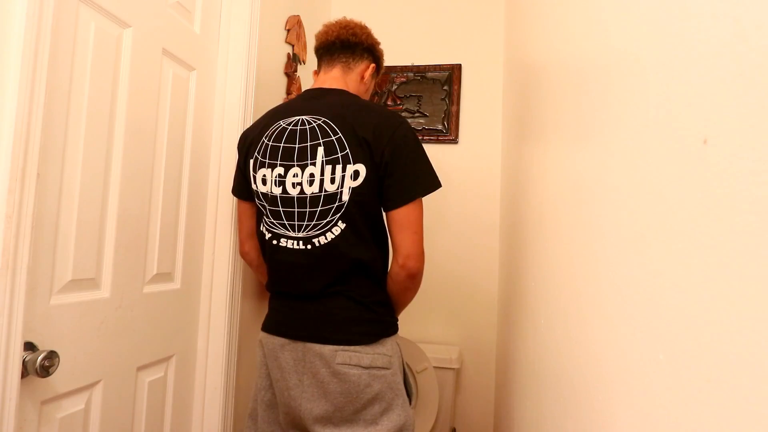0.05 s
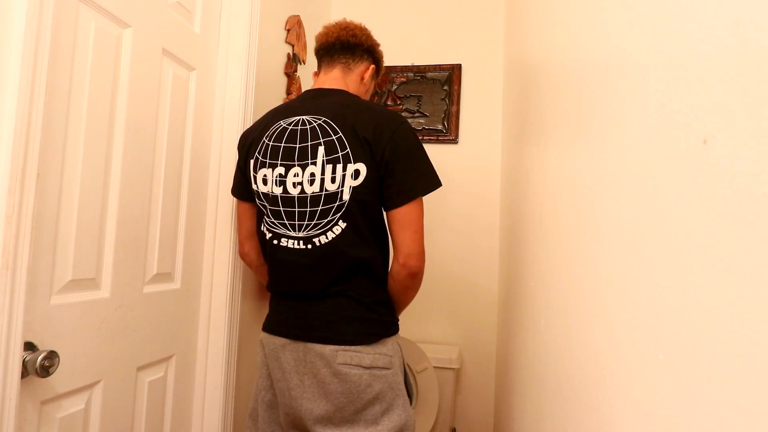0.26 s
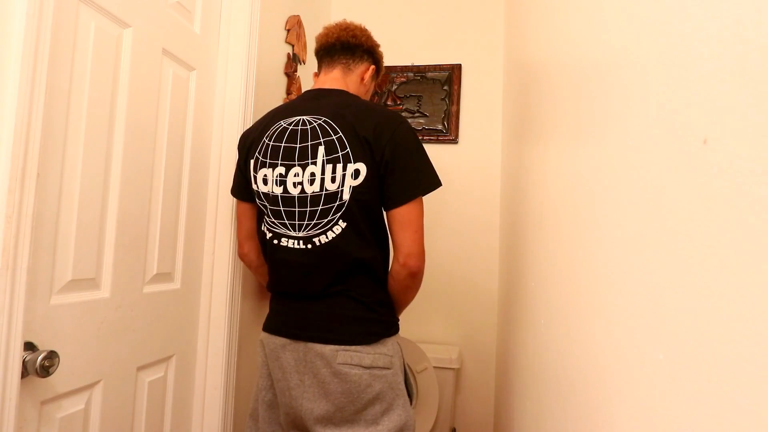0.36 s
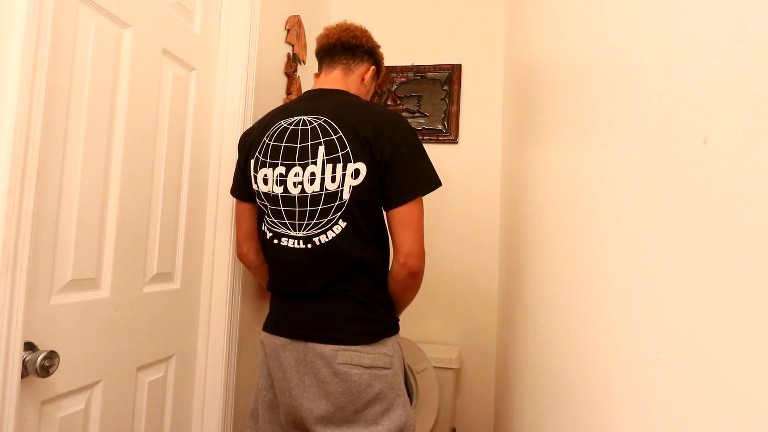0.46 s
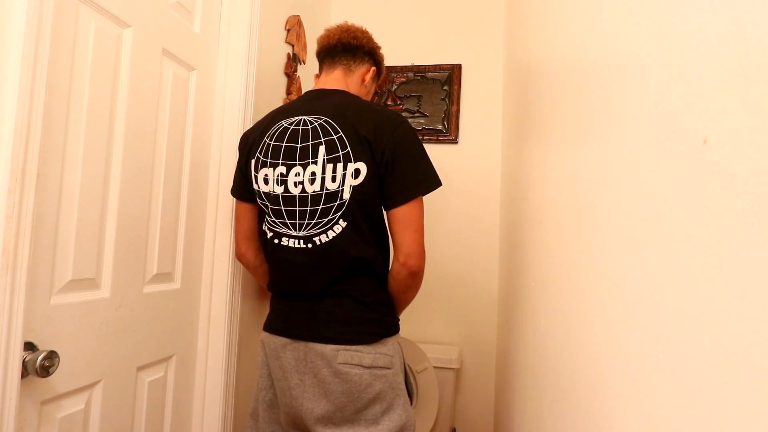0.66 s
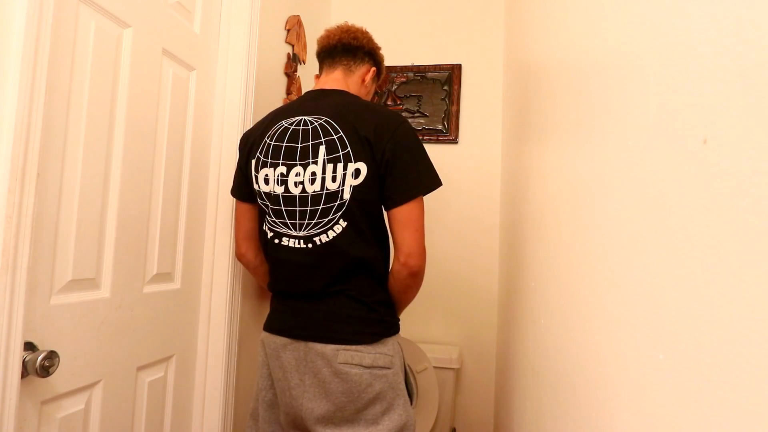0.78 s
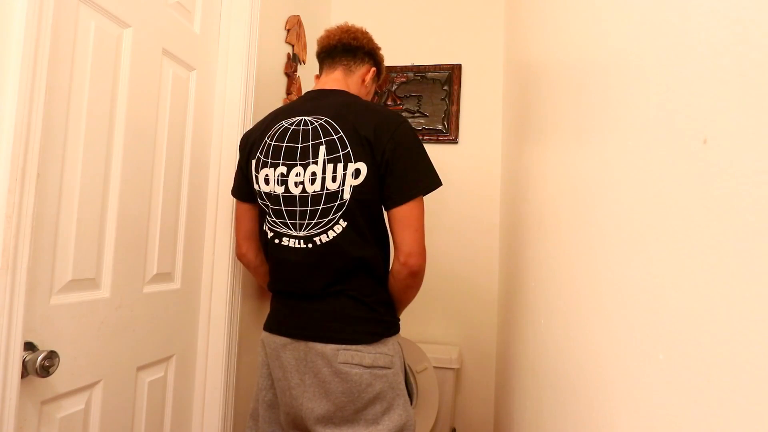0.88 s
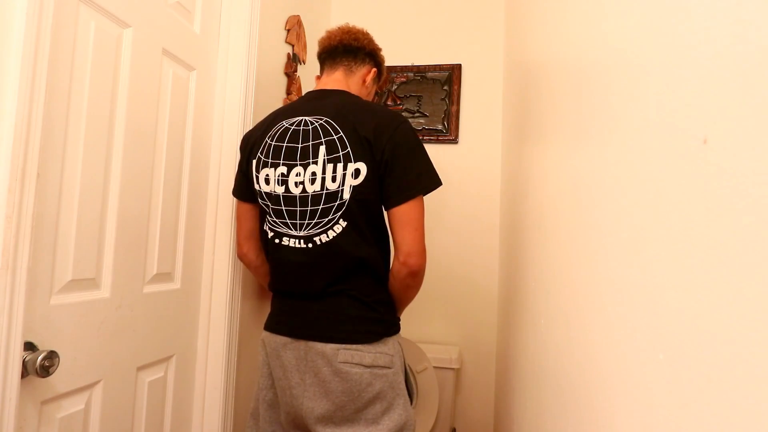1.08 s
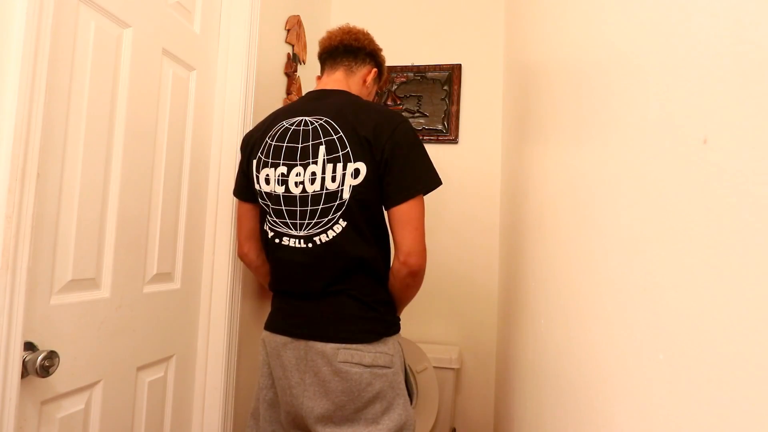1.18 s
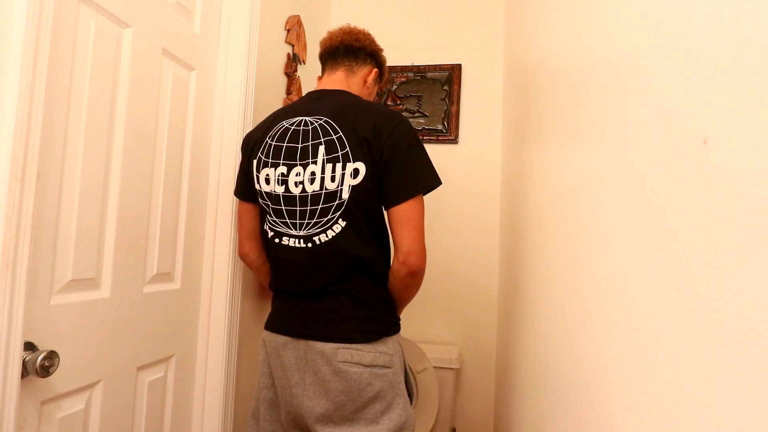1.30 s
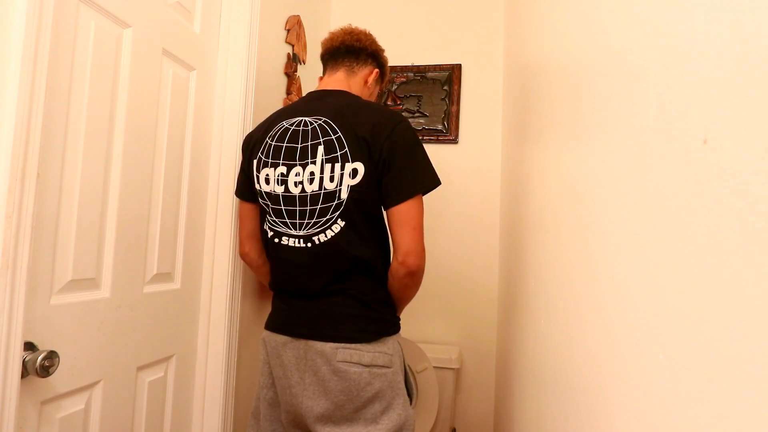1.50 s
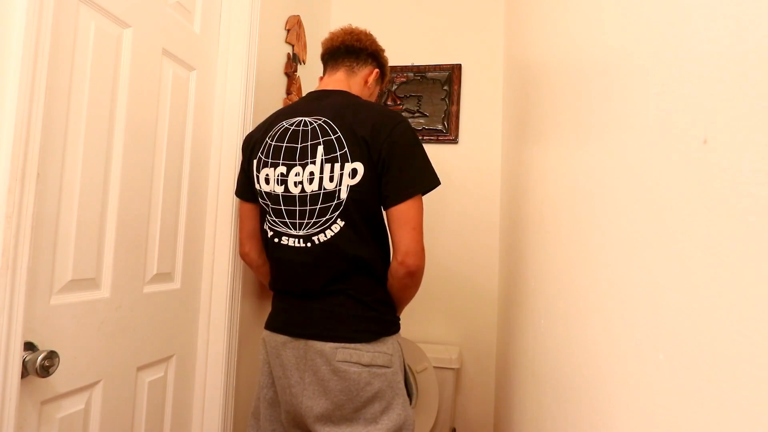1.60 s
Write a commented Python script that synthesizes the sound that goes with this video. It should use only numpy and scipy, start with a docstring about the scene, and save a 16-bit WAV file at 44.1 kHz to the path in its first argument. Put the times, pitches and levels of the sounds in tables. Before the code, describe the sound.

A short gush of liquid spatters into a toilet bowl, with gurgles and a plop.

```python
"""Two gurgles open a short gush of liquid into a toilet bowl in a small, hard-walled bathroom.
Fine drops spatter, a large bubble plops and a last splash falls back.
The gurgles and the plop are trapped air bubbles ringing; the spatter is many drops hitting the water.
The room rings after each sound, over a quiet hum of air."""
import sys
import numpy as np
from scipy import signal
from scipy.fft import rfft, irfft
from scipy.io import wavfile
from scipy.ndimage import uniform_filter1d

SR = 44100
rng = np.random.default_rng(int(sys.argv[2]) if len(sys.argv) > 2 else 0)


def store_wav(level_fs):
    """Save 16-bit WAV to argv[1]."""
    pcm = np.round(np.clip(np.atleast_2d(level_fs), -1, 1) * 32767)
    wavfile.write(sys.argv[1], SR, pcm.T.astype(np.int16))


N = 72765
TIME, FREQ = np.arange(N) / SR, np.fft.rfftfreq(N, 1 / SR)


def splashes():
    """Each splash is a burst of droplets, pitched by the size of the drops."""
    # one splash a row: start_s, pitch_hz, width_octaves, level_db, rise_s, decay_s
    bursts = [(0, 6570, 0.21, -49, 0.0016, 0.014), (0, 2110, .7, -47.5, .003, 0.011),
              (.040, 7560, 0.21, -49, 0.0086, 0.01), (.053, 2850, 0.12, -47.5, .004, 0.0094),
              (0.145, 13000, 0.061, -54.5, .003, .005), (0.169, 425, 0.63, -41.5, 0.009, .01),
              (.225, 1640, 0.32, -37, 0.0036, 0.035), (0.227, 2780, 0.25, -45.5, 0.007, 0.047),
              (0.27, 5070, 0.64, -40.5, 0.01, 0.0086), (0.345, 6950, 0.13, -35.5, 0.0063, 0.0048),
              (.376, 9630, 0.19, -59, 0.015, 0.012), (0.406, 263, 0.17, -57.5, .02, 0.066),
              (0.421, 4740, 0.6, -38.5, 0.011, 0.0089), (0.492, 5000, 0.56, -32, .003, 0.0044),
              (0.502, 2180, 0.33, -35, 0.0091, 0.017), (0.559, 1090, 0.26, -39, 0.011, 0.022),
              (0.579, 1520, 0.26, -36, 0.011, 0.012), (0.604, 3430, 0.21, -37, 0.007, 0.0078),
              (0.638, 9100, 0.18, -40.5, 0.0072, .006), (.659, 392, .4, -33, 0.0118, 0.0041),
              (0.663, 170, 0.53, -53.5, .01, 0.0082), (0.663, 970, 0.37, -28.5, 0.01, 0.009),
              (.666, 2550, 0.37, -36.5, 0.0061, 0.0032), (0.67, 1700, 0.34, -32, 0.013, 0.016),
              (.668, 10300, 0.21, -48, 0.0047, 0.0077), (0.719, 7400, 0.14, -43.5, 0.0087, 0.0037),
              (.720, 10400, .12, -47, .009, 0.0065), (.738, 12700, 0.14, -44.5, 0.0053, .011),
              (0.758, 5580, 0.15, -38.5, .012, 0.0054), (0.764, 3570, 0.34, -44, 0.0074, 0.0045),
              (.775, 4940, 0.65, -32, 0.0047, 0.0026), (0.775, 2270, 0.38, -31.5, 0.0022, 0.01),
              (.930, 10200, .12, -48.5, 0.0068, 0.0061), (1.1, 1120, 0.62, -58.5, .03, 0.092),
              (1.235, 2300, .4, -60.5, 0.012, 0.012)]
    return sum(amp(db) * swell(start, rise, decay) * colour(droplets(), band(hz, width))
               for start, hz, width, db, rise, decay in bursts)


def gush():
    """The stream hits the water and throws up fine spray and coarser spatter."""
    # how loud the stream is over time: time_s, spray_db, spatter_db
    flow = [(0.341, -95, -46.5), (0.386, -38.5, -52), (0.409, -48, -48), (.475, -48, -47), (.52, -40, -48),
            (.56, -43.5, -41), (.62, -50.5, -43), (.665, -63, -54), (.71, -75, -51)]
    # the bright tone of the spray: pitch_hz, relative_db
    spray_tone = [(1500, -34), (3500, -20), (5500, -0.5), (9000, -1.5), (12000, -5), (15500, -15)]
    # the fuller tone of the spatter: pitch_hz, relative_db
    spatter_tone = [(100, -7), (260, -3), (650, -5.5), (1100, 0.5), (2200, 3), (4000, 2), (7000, -6),
                    (14000, -12.5)]
    times, spray_db, spatter_db = np.transpose(flow)
    sound = np.zeros(N)
    for db, tone in ((spray_db, spray_tone), (spatter_db, spatter_tone)):
        loudness = amp(np.interp(TIME, times, db, left=-120, right=-120))
        sound += loudness * colour(droplets(), amp(look_up(tone, FREQ)))
    return sound


def droplets():
    """Many tiny drops of uneven size land at random in a fine, hissing mist."""
    drops_per_s, spread_db, mist = 1600, 4.5, 0.22
    sizes = amp(spread_db * np.minimum(rng.exponential(1, N), 4)) * rng.choice([-1, 1], N)
    lands = rng.random(N) < drops_per_s / SR
    return unit(sizes * lands) + mist * rng.standard_normal(N)


def bubbles():
    """Air bubbles slide up to their pitch and ring, a few with an echo; returns mono and stereo."""
    # one ring a row: a bubble, or its echo off the walls just after the first gurgle or the plop
    # start_s, pitch_hz, level_db, rise_s, decay_s, slide_octaves, left_over_right_db
    rings = [(.163, 565.6, -35.5, .010, 0.029, 0.113, 4.5), (.222, 575, -36.5, 0.0099, .008, 0, -9),
             (0.212, 1217, -42.5, 0.0064, 0.0064, 0.54, -4), (0.225, 1356, -34, 0.0064, 0.045, 0.14, 7),
             (0.223, 2844, -43, 0.0074, .004, .1, -5), (.253, 2580, -38, 0.0031, .004, 0.089, 10),
             (.391, 2240, -48, 0.0056, 0.0049, 0, -13), (.424, 4146, -41.5, 0.012, .008, 0.095, -15),
             (.560, 1051, -34.5, 0.012, 0.003, 0.015, -11),
             (.658, 726.2, -15.5, 0.0099, 0.0037, 0.027, -13.5),
             (.670, 1148, -26.5, 0.0027, 0.0034, 0.02, -15), (.696, 703, -28, 0.0069, 0.0033, 0.043, 7),
             (.724, 756, -26.5, .008, 0.0029, 0.015, 18), (.718, 1850, -48, 0.0018, 0.0019, 0, 23),
             (.778, 2660, -34.5, 0.0071, 0.00067, 0.14, -28), (.781, 2086, -45.5, .004, 0.046, 0.092, -25)]
    slide_s = 0.0062
    mono, stereo = np.zeros(N), np.zeros((2, N))
    for start, hz, db, rise, decay, octaves, pan_db in rings:
        age = np.maximum(TIME - start, 0)
        pitch = hz * 2 ** (-octaves * np.exp(-age / slide_s))
        cycles = np.cumsum((age > 0) * pitch) / SR
        ring = amp(db) * swell(start, rise, decay) * np.sin(2 * np.pi * cycles)
        mono += ring
        stereo += amp([[pan_db / 2], [-pan_db / 2]]) * ring
    return mono, stereo


def drop_clicks():
    """Large single drops slap the water, each with a very short click."""
    # one drop a row: start_s, pitch_hz, level_db
    drops = [(.3852, 7400, -27.5), (0.426, 4520, -29.5), (0.4944, 5270, -23.5), (0.529, 4040, -34),
             (.6040, 4400, -27), (.6200, 3720, -33), (.6500, 9300, -29.5)]
    rise_s, decay_s = 0.00019, 0.00039
    return sum(amp(db) * swell(start, rise_s, decay_s) * np.sin(2 * np.pi * hz * (TIME - start))
               for start, hz, db in drops)


def thud():
    """A faint low thud under the first gurgle."""
    pitch_hz, level_db = 72.1, -52.5
    loudness = amp(level_db) * swell(start_s=0.14, rise_s=0.035, decay_s=0.059)
    return loudness * np.sin(2 * np.pi * pitch_hz * TIME)


def bathroom(sound):
    """Close, hard walls send back a blur of echoes whose high notes die first."""
    # how alike the echoes are left and right: pitch_hz, likeness (0 to 1)
    likeness = [(100, 0.82), (350, 0.94), (700, 0.023), (2000, 0.35), (15000, 0)]
    # how long the room takes to fade by 60 dB: pitch_hz, fade_s
    fade_times = [(150, 0.87), (550, 0.38), (740, 0.44), (1400, 0.45), (2500, 0.21), (5000, 0.22),
                  (9000, 0.21), (15000, 0.088)]
    first_echo_s, build_s = 0.0021, 0.0016
    hz, t, slices = signal.stft(stereo_noise(likeness)[:, :SR], SR, nperseg=256)
    fade = amp(-60 * t / look_up(fade_times, hz)[:, None])
    echoes = signal.istft(slices * fade, SR, nperseg=256)[1][:, :SR]
    onset = np.clip((TIME[:SR] - first_echo_s) / build_s, 0, 1)
    spectrum = rfft(echoes * onset)
    # even out the tone, so that lows and highs come back equally strong
    strength = np.sqrt(uniform_filter1d(abs(spectrum) ** 2, size=70, axis=1))
    echoes = irfft(spectrum / strength)[:, :SR * 3 // 4]
    return signal.fftconvolve(sound[None], echoes, axes=1)[:, :N]


def air():
    """Quiet room noise and a faint low hum, both slowly fading."""
    # the tone of the room noise: pitch_hz, relative_db
    tone = [(15, -43), (25, -6.5), (70, -4.5), (100, -12), (145, -9), (190, -13), (260, -9), (390, -8),
            (560, -12.5), (1050, -14.5), (1850, -16.5), (3300, -19), (4900, -23), (7000, -18),
            (9500, -19.5), (12500, -23.5), (15500, -28.5)]
    # how alike that noise is left and right: pitch_hz, likeness (0 to 1)
    likeness = [(60, 0.4), (300, 0.52), (600, 0.24), (1650, 0.033), (5000, 0.021), (15000, 0.033)]
    final_hiss_db, final_hum_db, fall_db_per_s = -54.5, -68, 2
    hiss = amp(final_hiss_db) * colour(stereo_noise(likeness), amp(look_up(tone, FREQ)))
    hum = amp(final_hum_db) * colour(rng.standard_normal(N), band(hz=379.5, octaves=0.04))
    return (hiss + hum) * amp(fall_db_per_s * (TIME[-1] - TIME))


def stereo_noise(likeness):
    """Left and right noise, as alike at each pitch as the table says."""
    left, other = rng.standard_normal((2, N))
    shared = np.clip(look_up(likeness, FREQ), 0, 1)
    right = irfft(shared * rfft(left) + np.sqrt(1 - shared ** 2) * rfft(other), N)
    return np.array([left, right])


def swell(start_s, rise_s, decay_s):
    """A loudness curve that rises smoothly, then dies away."""
    age = np.maximum(TIME - start_s, 0)
    rise = np.sin(np.pi / 2 * np.minimum(age / rise_s, 1))
    return rise * np.exp(-np.maximum(age - rise_s, 0) / decay_s)


def band(hz, octaves):
    """A bell-shaped filter curve that keeps the pitches near hz."""
    return np.exp(-0.5 * (np.log2((FREQ + 1) / hz) / octaves) ** 2)


def colour(sound, gain):
    """Turns each pitch up or down by its gain, then sets the average level to one."""
    return unit(irfft(rfft(sound) * gain, N))


def look_up(table, hz):
    """Reads between a table's rows, along a pitch scale spaced in octaves."""
    pitches, values = np.transpose(table)
    return np.interp(np.log(hz + 1), np.log(pitches + 1), values)


def unit(sound):
    """Sets the average level (rms) to one."""
    return sound / np.sqrt(np.mean(sound ** 2) + 1e-20)


def amp(db):
    """Turns decibels into a number to multiply by."""
    return 10 ** (np.asarray(db) / 20)


def scene():
    """The water in the bowl, heard directly and off the walls, over the thud and the air."""
    bubble_direct_db, water_direct_db, water_room_db = -3, -3.5, 1
    click_boost_db, right_delay_s = 5.5, 0.00023
    bubbles_mono, bubbles_stereo = bubbles()
    water, clicks = splashes() + gush(), drop_clicks()
    left = water + amp(click_boost_db) * clicks  # single drops are heard more directly than the spray
    right = np.interp(TIME - right_delay_s, TIME, left)  # the splashes reach the left side first
    direct = amp(bubble_direct_db) * bubbles_stereo + amp(water_direct_db) * np.array([left, right])
    echoes = bathroom(bubbles_mono + amp(water_room_db) * (water + clicks))
    return direct + echoes + thud() + air()


def record(dry):
    """Cuts away the very highest treble."""
    cutoff_hz = 15700
    low_pass = signal.firwin(511, cutoff_hz, window=("kaiser", 9), fs=SR)
    return signal.oaconvolve(dry, low_pass[None], "same")


dry = scene()
out = record(dry)
store_wav(out)
```